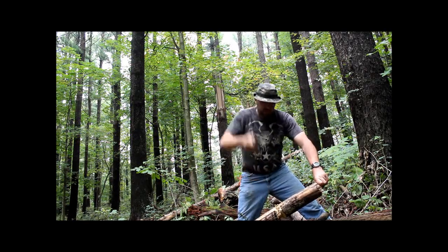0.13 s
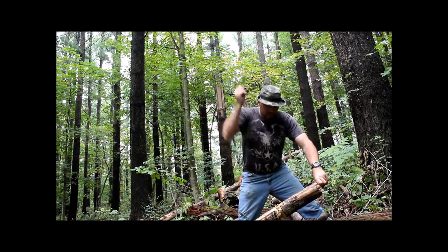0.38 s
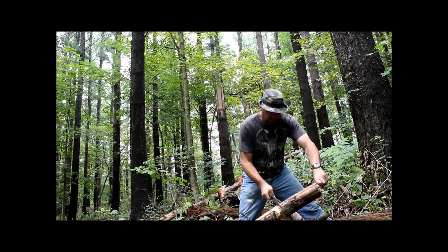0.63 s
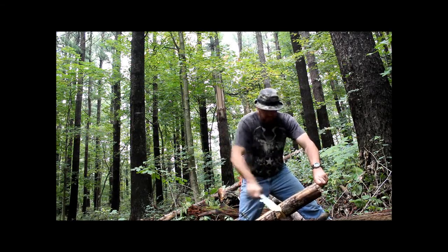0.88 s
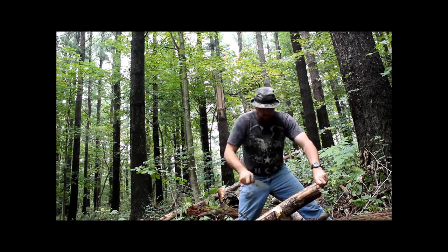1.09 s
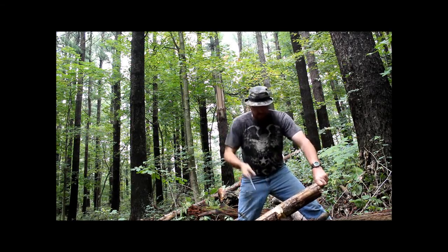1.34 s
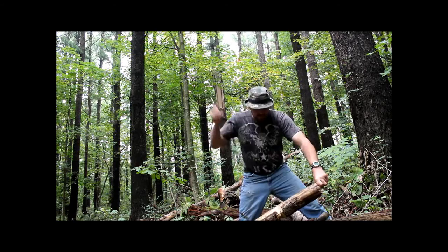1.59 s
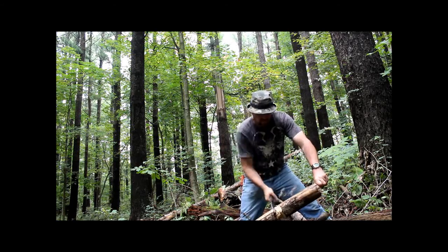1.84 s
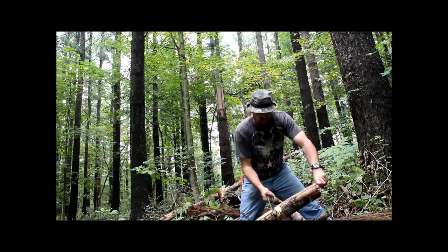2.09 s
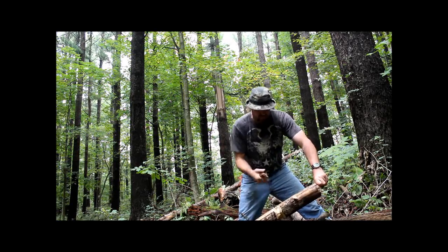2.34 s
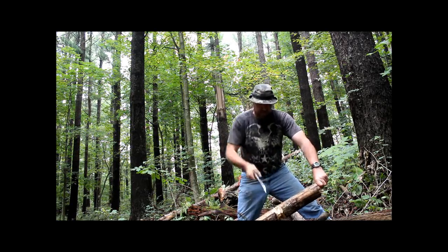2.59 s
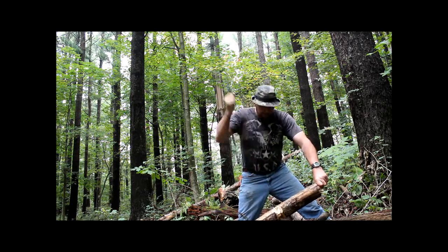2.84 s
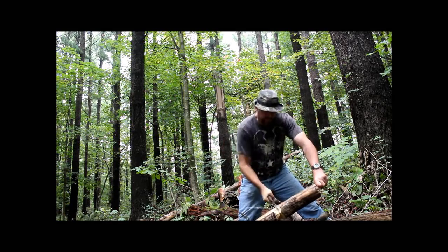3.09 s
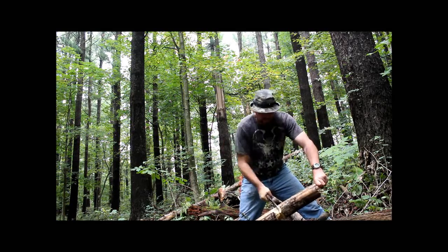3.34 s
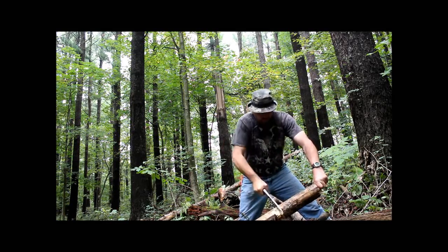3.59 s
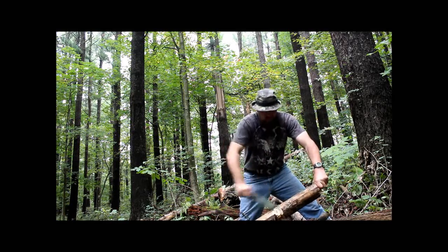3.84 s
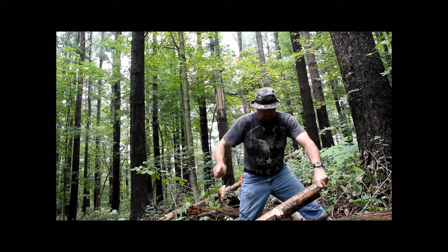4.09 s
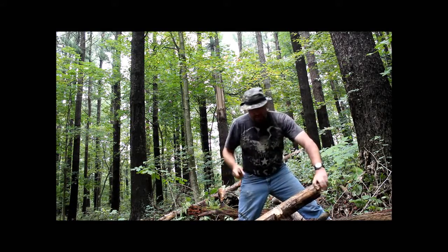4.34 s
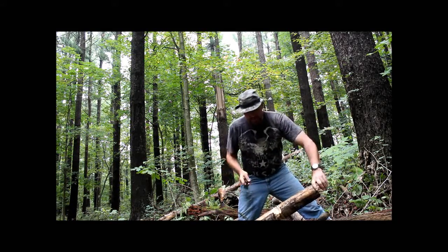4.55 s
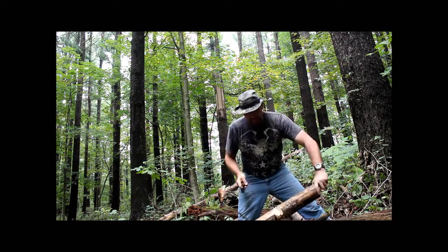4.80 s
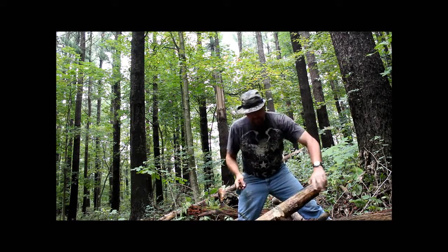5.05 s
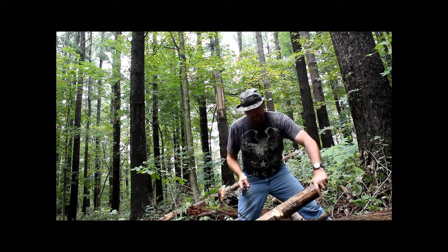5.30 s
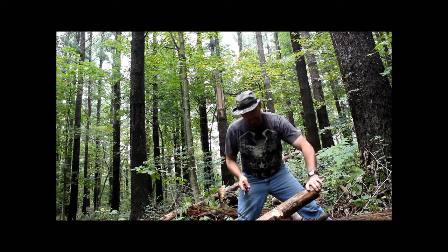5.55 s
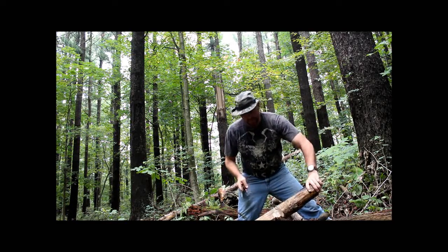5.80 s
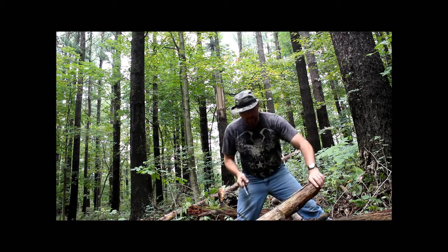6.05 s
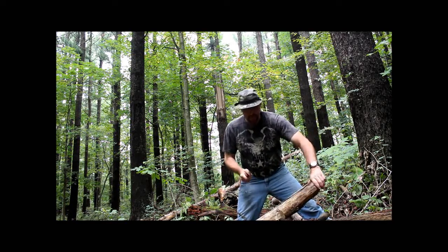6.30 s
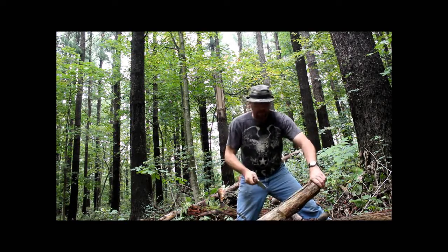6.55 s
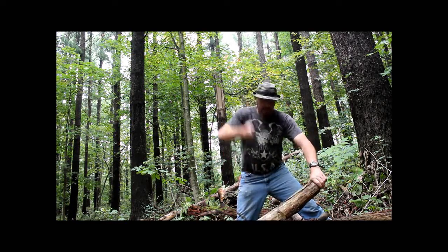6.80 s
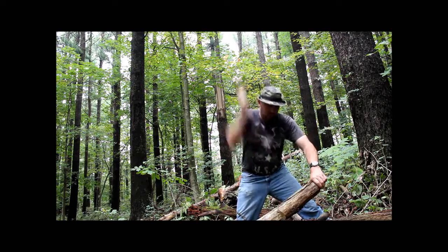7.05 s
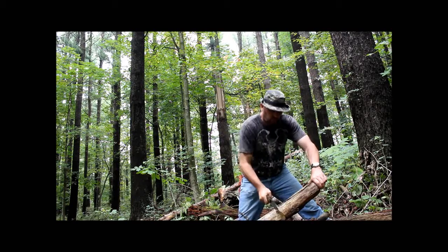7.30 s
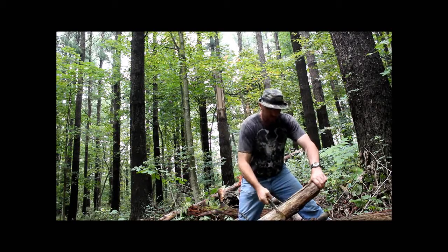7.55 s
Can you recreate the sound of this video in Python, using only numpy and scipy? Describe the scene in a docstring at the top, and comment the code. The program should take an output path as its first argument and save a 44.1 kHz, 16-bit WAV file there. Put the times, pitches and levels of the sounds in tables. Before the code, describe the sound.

In a forest, a heavy blade bites a dry dead log: three loud, sharp chops about a second and a quarter apart, then a pause with prying snaps and light chip scatter, and one last duller, heavier chop near the end. Each blow is close, slightly overloaded, and scatters briefly back from the trunks. Soft leaf hush and faint high insect buzz lie beneath.

```python
"""Forest: a heavy knife chops a dead log, four chops and two light knocks, with prying and falling chips between.
Chops are noise bursts ringing log and blade modes; they overload the input and scatter back from the trunks.
Snaps are dying band noise; ground waves ring the camera stand's low modes.
Filtered noise makes the leaf hush, rustle and far insects; sines make faint pips and a passing fly."""
import sys
import numpy as np
from scipy import signal
from scipy.fft import rfft, irfft
from scipy.io import wavfile
from scipy.ndimage import map_coordinates

SR = 44100
rng = np.random.default_rng(int(sys.argv[2]) if len(sys.argv) > 2 else 0)


def attenuation_scalar(level_db):
    """Turn a level in dB into a linear amplitude multiplier (20 dB per decade)."""
    decades = np.asarray(level_db, float) / 20
    return 10 ** decades


def materialize(psi):
    """Save the field psi as 16-bit PCM at rate SR to the path in sys.argv[1].

    A 1-D psi becomes a single channel; in a 2-D psi each row is a channel.
    """
    bounded = np.clip(np.atleast_2d(psi).T, -1, 1)
    quanta = np.round(bounded * 32767).astype(np.int16)
    wavfile.write(sys.argv[1], SR, quanta)


N = 337806

# blows on the log; deep cuts sound duller; ground reflection cuts notches: (time [s], thud drive [dB],
# tearing drive [dB], cut depth [0-1], notch spacing [Hz], ground bounce [0-1, capped at 0.95 in use])
BLOWS = [(0.5466, -17, -0.5, 0.07, 2940, 0.3), (0.895, -35, -53, 0.95, 3000, .2),
         (1.8292, -12, -0.5, 0.35, 2090, 1), (3.071, -7, 0.5, 0.54, 3740, 0.05),
         (3.8138, -28.5, -21.5, .95, 3000, .2), (7.1754, -1.5, -3, 0.98, 3070, 0.4)]
# modes of log and blade: (frequency [Hz], relative level [dB], t60 [s])
LOG_MODES = [(154, -26.5, 0.14), (256, -2, 0.022), (373, -14, 0.077), (440, -7.5, 0.042), (650, 0.5, 0.007),
             (794, -3, 0.022), (1106, 2, 0.006), (1652, -2.5, 0.015), (1902, -6.5, 0.028),
             (2222, 5, 0.0058), (2660, 5, 0.002), (3620, -8, 0.013), (4156, 3, 0.0033), (5210, 9, 0.0048),
             (5710, 8.5, 0.0015), (8510, 8.5, 0.0024), (9350, 9.5, 0.00495), (11340, 17, 0.00076),
             (11520, 14, 0.0026)]
# upper edges of the lower mode groups, thud to crack; sizzle lies above: (frequency [Hz])
GROUP_TOPS_HZ = [600, 1400, 3300, 6500]
# tearing drive of the upper mode groups, by cut: (knock [dB], clack [dB], crack [dB], sizzle [dB])
SHALLOW_DRIVE_DB = (-7.5, -4.5, -4.5, -6.5)
DEEP_DRIVE_DB = (-9.5, -10, -6, -20.5)
# sound sent into the forest all around: (frequency [Hz], shallow cut [dB], deep cut [dB])
SENT_COLOUR = [(320, 20.5, 33.5), (844, 17, 17.5), (1390, 13.5, 12), (2330, 27.5, 10), (3420, 18.5, 10.5),
               (4630, 22.5, 10), (6600, 20, 16.5), (10900, 24.5, 14.5)]
# chips, twigs, blade pried loose; clean breaks have little scratch, scuffs are mostly scratch:
# (time [s], level [dB], brightness [0 low, 1 middle, 2 high], scratch [dB], left-right [dB])
SNAPS = [(0.286, -36, 0.73, 3, 1), (0.291, -34, 1.4, 5, -15), (0.302, -19.5, 1.86, -14, -11),
         (0.845, -28.5, 1.44, 2, -4), (0.856, -26, 1.58, -3, -1.5), (0.940, -31, 1.8, 12, -1.5),
         (0.972, -31.5, 1.53, -2, -2.5), (1.016, -30.5, 1.48, -7.5, -1.5), (1.134, -30, 1.87, -13, -4),
         (1.139, -27, 1.6, -11, -9), (2.143, -25, 1.5, 9, -5), (2.155, -30, 1.1, -12, -2.5),
         (2.1613, -24.5, 0.8, -6, 1), (2.455, -34, 0.46, 1.5, -1.5), (2.529, -30, 1, -3, 7),
         (2.651, -40, 1, 1.5, 17), (2.683, -29.5, 1.45, 3.5, -9), (2.729, -30, .5, -18, 5),
         (3.024, -31.5, 1.76, 18, -11), (3.63, -47, 1.2, -11, -5), (3.635, -15.5, 1.16, -30, -6),
         (3.744, -34, 1.4, 0, -1), (3.803, -36, 0.93, -15, 0), (3.809, -34, 1.4, -3, -4),
         (3.815, -23, 0.15, -1, -3), (4.18, -32.5, 1.14, 15, -4), (4.727, -24.5, 1.97, -7.5, -5),
         (4.729, -39, 0.13, -10, -2.5), (4.82, -38.5, 1.9, 15, -1.5), (5.076, -33, 1.3, 13, -4),
         (5.319, -29.5, 1.2, 14, -3), (5.326, -40, .1, -3, -2.5), (7.143, -34, 0.28, 10, -1),
         (7.192, -21, 0.57, 3.5, -1.5), (7.497, -35, 1.5, 4, -2.5), (7.533, -33.5, 1.36, 1, -1.5),
         (7.593, -35, 1.6, -6, -2.5)]
# snap noise bands: (low edge [Hz], high edge [Hz], t60 [s])
SNAP_BANDS = [(600, 1680, 0.033), (1410, 5400, 0.013), (3860, 10200, 0.0053)]
# envelope of the sound scattered by the trunks: (time after source [s], relative level [dB])
SCATTER = [(.005, -29), (.02, -42), (.06, -41), (.1, -39), (.135, -38), (.2, -41.5), (.35, -48.5),
           (.6, -60), (.9, -76)]
# colour of the scattered sound: (frequency [Hz], relative level [dB], extra level change [dB/s])
TRUNK_COLOUR = [(193, -1.5, -31), (1530, 7.5, 2), (4320, 10.5, -15.5), (9000, 0, -45), (13400, -11, -60)]
# modes of the camera stand: (frequency [Hz], relative level [dB], t60 [s])
STAND_MODES = [(31.5, -4.5, 2), (46, -5, 2.1), (56.7, 1, 0.88), (72.7, -2, 0.42), (124.7, 1.5, 0.49)]
# ground waves from blows and shifted feet: (crest time [s], low modes drive [dB], top mode drive [dB])
SHAKES = [(.385, -60, -51.5), (0.706, -47.5, -47), (1.9887, -47, -45.5), (3.228, -46.5, -44.5),
          (7.009, -80, -57), (7.273, -46, -46)]
# spectrum of the leaf hush: (frequency [Hz], relative power density [dB])
HUSH = [(20, -6), (46, -1), (100, 5.5), (180, -1.5), (370, -1.5), (700, -1), (1000, -2), (1700, -4),
        (2100, -9.5), (3500, -14), (6000, -20), (12500, -17)]
# leaves and clothes: (time [s], relative level [dB])
RUSTLE = [(0, -56), (.4, -57), (1.2, -60.5), (1.6, -58.5), (2.5, -56), (3, -59.5), (3.7, -57.5), (4.3, -60),
          (5.1, -58.5), (5.6, -62), (5.9, -57), (6.3, -60.5), (7.1, -62), (7.66, -55)]
# stereo likeness of diffuse sound: (frequency [Hz], left-right likeness [0-1])
LIKENESS = [(60, 0.98), (150, 0.85), (360, 0.75), (880, 0.82), (2150, 0.44), (5250, 0.77), (12800, 0.59)]
# stereo balance: (frequency [Hz], left-right [dB])
LEAN = [(60, 3.5), (230, 2), (880, -2.5), (3360, -2.5), (12800, -0.5)]
# wing resonances of the far chorus: (frequency [Hz], width of first filter [Hz], mean level [dB])
CHORUS = [(4940, 970, -55.5), (5130, 230, -64)]
# faint short tones: (centre time [s], frequency [Hz], peak level [dB])
PIPS = [(4.245, 1340, -49), (4.28, 1365, -47.5), (5.04, 1650, -50)]


def rms_one(x):
    """Scale to unit power."""
    return x / np.sqrt(np.mean(x ** 2) + 1e-20)


def at_hz(points, hz, axis=1):
    """Read a table column on a log-frequency axis."""
    points = np.array(points)
    return np.interp(np.log(hz + 1), np.log(points[:, 0]), points[:, axis])


def sides(lean_db):
    """Left and right gains."""
    return attenuation_scalar(np.array([lean_db / 2, -lean_db / 2]))


def drift(rate_hz):
    """Slow random curve through unit-spread knots."""
    knots = rng.standard_normal(int(N / SR * rate_hz) + 3)
    return map_coordinates(knots, [np.arange(N) * rate_hz / SR], order=3)


def by_depth(shallow, deep, depth):
    """Interpolate between a shallow and a deep cut."""
    return np.add(shallow, depth * np.subtract(deep, shallow))


def ring(force, hz, t60_s):
    """Two-pole mode: a unit click starts a dying sine of height 1."""
    r = attenuation_scalar(-60 / (t60_s * SR))
    w = 2 * np.pi * hz / SR
    return signal.lfilter([0, np.sin(w)], [1, -2 * r * np.cos(w), r * r], force + 1e-18)


def resonance(x, hz, width_hz):
    """Two-pole band-pass, peak gain about 1."""
    r = np.exp(-np.pi * width_hz / SR)
    poles = [1, -2 * r * np.cos(2 * np.pi * hz / SR), r * r]
    return signal.lfilter([1, 0, -1], poles, x) * (1 - r * r) / 2


def diffuse(size, colour):
    """Stereo noise from all around, with likeness and balance set by frequency."""
    hz = np.fft.rfftfreq(size, 1 / SR)
    mid, side = rfft(rng.standard_normal((2, size)))
    alike = np.clip(at_hz(LIKENESS, hz), 0, 1)
    both = np.sqrt(1 + alike) * mid + np.sqrt(1 - alike) * side * [[1], [-1]]
    return irfft(both * colour(hz) * sides(at_hz(LEAN, hz)), size) / np.sqrt(2)


def place(out, sound, time_s):
    """Add a sound at a moment."""
    at = int(time_s * SR)
    laid = np.zeros_like(out)
    laid[:, at:at + sound.shape[-1]] = sound[..., :N - at]
    return out + laid


def hush():
    """Soft leaf hush: coloured diffuse noise, level drifting slightly."""
    noise = diffuse(size=N, colour=lambda hz: attenuation_scalar(at_hz(HUSH, hz)))
    return attenuation_scalar(-52 + 0.21 * drift(1.35)) * rms_one(noise)


def rustle():
    """Dry leaves: dense random crackles modulate a smooth hiss."""
    time_s, level_db = np.transpose(RUSTLE)
    sizes = attenuation_scalar(3.5 * np.minimum(rng.exponential(1, N), 5))
    grains_per_s = 1500 * attenuation_scalar(5 * drift(6))
    grains = sizes * (rng.random(N) < grains_per_s / SR)
    gate = 0.69 + 0.35 * rms_one(signal.lfilter([1], [1, -.97], grains))
    hiss = diffuse(size=N, colour=lambda hz: hz / np.hypot(hz, 1800) / np.hypot(hz, 9000))
    return attenuation_scalar(np.interp(np.arange(N) / SR, time_s, level_db) + 2.5) * rms_one(gate * hiss)


def insects():
    """Far chorus: noise through wing resonances; one cricket: pulsed narrow noise."""
    cricket_hz, cricket_width_hz, cricket_db, pulses_hz = 2780, 60, -65.5, 32.5   # mean level and pulse rate
    scrape = diffuse(size=N, colour=np.ones_like)
    out = 0
    for hz, width_hz, level_db in CHORUS:
        buzz = resonance(resonance(scrape, hz, width_hz), hz, 0.76 * width_hz)
        out = out + attenuation_scalar(level_db + 1.1 * drift(21)) * rms_one(buzz)
    pulse_phase = 2 * np.pi * np.cumsum(pulses_hz + 0.44 * drift(2)) / SR
    pulses = 0.5 + np.maximum(np.sin(pulse_phase), 0)
    trill = pulses * resonance(rng.standard_normal((2, N)), cricket_hz, cricket_width_hz)
    return out + attenuation_scalar(cricket_db + 0.8 * drift(5)) * rms_one(trill)


def trunks():
    """Forest impulse response: diffuse noise, each band with its own loss over time."""
    t = np.arange(SR) / SR
    out = 0
    for k, (_, level_db, change_db_per_s) in enumerate(TRUNK_COLOUR):
        share = [(row[0], float(j == k)) for j, row in enumerate(TRUNK_COLOUR)]   # crossfaded bands
        band = diffuse(size=SR, colour=lambda hz: at_hz(share, hz))
        out = out + attenuation_scalar(level_db + change_db_per_s * t) * band
    time_s, level_db = np.transpose(SCATTER)
    return out * attenuation_scalar(np.interp(t, time_s, level_db) - 17.5) * (t > time_s[0]) * (t < time_s[-1])


def crumbs(count):
    """Faint crumbs at random moments, as rows like those of SNAPS."""
    level_db, spread_db = -46, 5
    when, size, bright, scratch, lean = rng.random((count, 5)).T
    levels_db = level_db + spread_db * (2 * size - 1)
    return list(zip(when * N / SR, levels_db, 2 * bright, 12 * scratch - 9, 6 * lean - 5))


def snaps(forest):
    """Wood snaps: a crack and dying noise in three bands, a scratch of crumbs behind, scattered by the forest."""
    break_db, scratch_rise_s, scratch_t60_s, landings_per_s = 12, 0.0029, 0.07, 400
    fall_db = 19   # band loss per squared step from the snap's brightness
    t = np.arange(SR // 12) / SR
    rows = SNAPS + crumbs(count=14)
    filters = [signal.butter(2, [low, high], "band", fs=SR, output="sos") for low, high, _ in SNAP_BANDS]
    grains = rng.standard_normal((len(rows), len(t)))
    grains[:, 0] = attenuation_scalar(break_db)   # first crack stands above the noise
    landing = rng.random((len(rows), len(t))) < landings_per_s / SR
    scratch_fade = np.minimum(t / scratch_rise_s, 1) * attenuation_scalar(-60 * t / scratch_t60_s)
    scratches = scratch_fade * (.3 + signal.lfilter([1], [1, -.96], landing))
    out = np.zeros((2, N))
    for row, grain, scratch in zip(rows, grains, scratches):
        time_s, level_db, bright, scratch_db, lean_db = row
        snap = 0
        for k, (sos, (_, _, t60_s)) in enumerate(zip(filters, SNAP_BANDS)):
            envelope = attenuation_scalar(-60 * t / t60_s) + attenuation_scalar(scratch_db) * scratch
            part = signal.sosfilt(sos, grain * envelope)
            snap = snap + attenuation_scalar(level_db - fall_db * (k - bright) ** 2) * part / abs(part).max()
        out = place(out, snap * sides(lean_db)[:, None], time_s)
    return out + attenuation_scalar(-11) * signal.oaconvolve(forest, out[:1], axes=1)[:, :N]


def stand():
    """Camera stand: a slow ground wave swells to its crest, then the modes ring out."""
    rise_s = 0.078
    out = np.zeros(N)
    for crest_s, low_db, top_db in SHAKES:
        t = np.arange(N) / SR - crest_s
        swell = np.exp(-(np.minimum(t, 0) / rise_s) ** 2)
        for hz, mode_db, t60_s in STAND_MODES:
            drive_db = low_db if hz < 100 else top_db
            level_db = mode_db + drive_db - 60 * np.maximum(t, 0) / t60_s
            out -= attenuation_scalar(level_db) * swell * np.cos(2 * np.pi * hz * t)
    return out * sides(2.8)[:, None]


def chop(bite_ms, stop_ms, splinters_db, strengths_db):
    """The biting blade tears fibres (noise drive) and jerks the log (push) when stopped; both ring modes."""
    mode_spread_db = 3   # neighbouring thud modes radiate to opposite sides
    low_cut_hz = 156   # the chops carry little sound below this
    t = np.arange(SR // 5) / SR
    biting = np.where(t < bite_ms / 1000, 1, attenuation_scalar(splinters_db - 1870 * t))   # splinters crackle on
    mid, side = biting * rng.standard_normal((2, len(t)))
    tearing = mid + 0.1 * side * [[1], [-1]]
    turn = np.clip((t - stop_ms / 1000) / .0005, 0, 1)
    push = np.sin(2 * np.pi * turn)   # forth and back: no net air moved
    out = 0
    for k, (hz, level_db, t60_s) in enumerate(LOG_MODES):
        group = np.searchsorted(GROUP_TOPS_HZ, hz)
        sign = (-1) ** k   # neighbouring modes move in opposite senses
        rung = ring(sign * tearing if group else push, hz, t60_s)
        lean_db = at_hz(LEAN, hz) + sign * mode_spread_db * (group == 0)
        gain = attenuation_scalar(level_db + strengths_db[group])
        out = out + gain * rung / abs(rung).max() * sides(lean_db)[:, None]
    return signal.sosfilt(signal.butter(2, low_cut_hz, "high", fs=SR, output="sos"), out)


def blows(forest):
    """Direct chops plus forest scatter, where summed directions blur the modes into a smooth colour."""
    bite_ms, stop_ms, splinters_db = (3.0, 1.7), (1.39, 0.41), (-21, -5)   # (shallow cut, deep cut)
    out = np.zeros((2, N))
    hz = np.fft.rfftfreq(SR, 1 / SR)
    forest_spectrum = rfft(forest)
    for time_s, thud_db, tear_db, depth, notch_hz, bounce in BLOWS:
        stroke = [by_depth(*pair, depth) for pair in (bite_ms, stop_ms, splinters_db)]
        strengths_db = [thud_db, *(tear_db + by_depth(SHALLOW_DRIVE_DB, DEEP_DRIVE_DB, depth))]
        out = place(out, chop(*stroke, strengths_db), time_s)
        sent_db = tear_db + by_depth(at_hz(SENT_COLOUR, hz), at_hz(SENT_COLOUR, hz, axis=2), depth)
        delay = np.exp(-2j * np.pi * hz / notch_hz)
        back = np.clip(bounce, 0, .95) * delay * (hz > notch_hz / 2)   # ground reflection
        colour = attenuation_scalar(sent_db) * (1 - back) / (1 - back / 2)
        out = place(out, irfft(forest_spectrum * colour, SR), time_s)
    return out


def pips():
    """Brief soft tones: sines under Gaussian swells."""
    half_width_s = 0.0066
    t = np.arange(N) / SR
    out = 0
    for time_s, hz, level_db in PIPS:
        swell = np.exp(-((t - time_s) / half_width_s) ** 2)
        out = out + attenuation_scalar(level_db) * swell * np.sin(2 * np.pi * hz * t)
    return out


def fly():
    """Faint wingbeat hum: a drifting sine that fades in and out."""
    from_s, to_s, fade_s, wingbeat_hz, level_db = 5.68, 6.15, 0.067, 255.5, -64.5   # rms level, mean pitch
    t = np.arange(N) / SR
    fade = np.clip(np.minimum(t - from_s, to_s - t) / fade_s, 0, 1)
    phase = 2 * np.pi * np.cumsum(wingbeat_hz + drift(4)) / SR
    return fade * attenuation_scalar(level_db) * np.sqrt(2) * np.sin(phase)


def scene():
    """Sum of all sources at the microphone."""
    forest = trunks()
    steady = hush() + rustle() + insects()
    return steady + snaps(forest) + stand() + blows(forest) + pips() + fly()


def band_limit(x):
    """A steep low-pass at the top of the band."""
    return signal.sosfilt(signal.butter(12, 13450, fs=SR, output="sos"), x)


def record(dry):
    """Loud blows saturate the input; its coupling sheds part of the clipped wave's slow lurch; the top is cut."""
    cutoff_hz, lurch_shed = 13550, 0.25   # share of lurch removed
    clipped = 0.95 * np.tanh(dry / 0.97)
    lurch = signal.sosfilt(signal.butter(1, 300, fs=SR, output="sos"), clipped - dry)
    top_cut = signal.cheby2(14, 50, cutoff_hz, fs=SR, output="sos")
    cut = signal.sosfilt(top_cut, clipped - lurch_shed * lurch)
    loud_peaks = clipped * (abs(dry) > .2)   # gated, so its edges are sharp
    return band_limit(np.clip(cut + attenuation_scalar(-9.5) * loud_peaks, -1, 1))


dry = scene()
out = record(dry)
materialize(out)
```